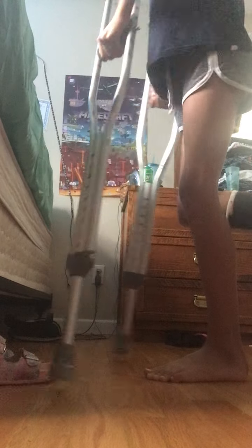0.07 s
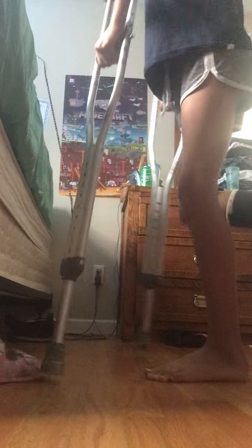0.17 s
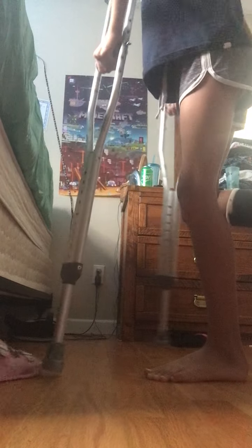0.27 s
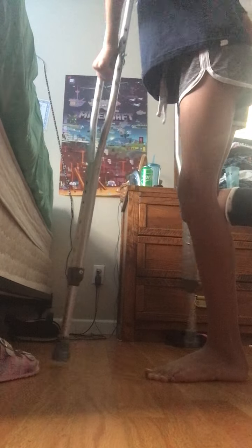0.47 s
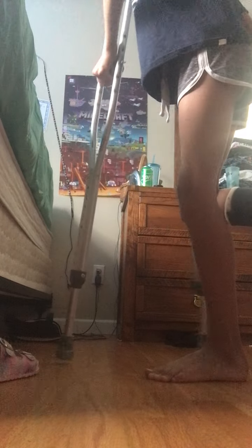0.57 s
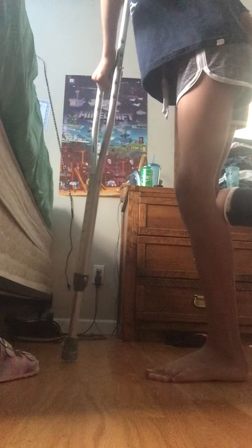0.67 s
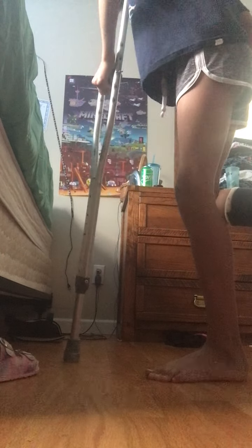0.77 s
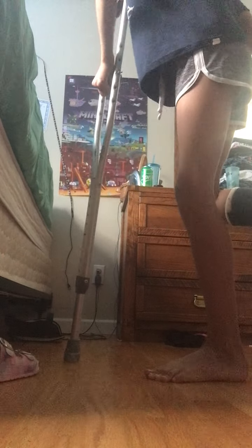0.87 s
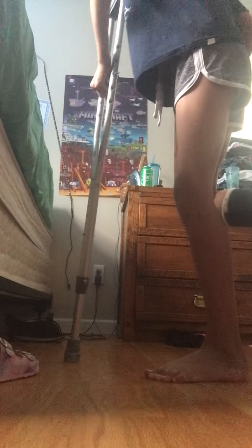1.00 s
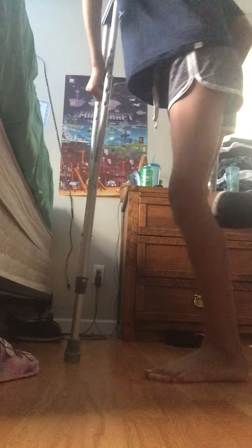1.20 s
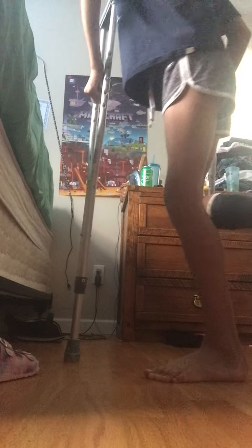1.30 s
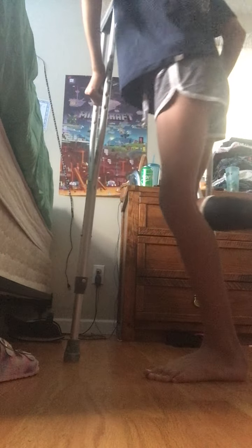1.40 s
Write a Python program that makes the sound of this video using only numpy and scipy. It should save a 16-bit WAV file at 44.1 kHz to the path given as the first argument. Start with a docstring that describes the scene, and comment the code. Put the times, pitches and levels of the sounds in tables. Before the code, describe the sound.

Metal crutches are planted on a wooden floor in a quiet bedroom. One rubber tip thuds as its loose tubes clack, then the second lands more softly, followed by a faint settling tick and knock.

```python
"""Two aluminium crutches are planted on a wooden floor in a small, quiet bedroom.
First one rubber tip thuds on the boards, and its loose sliding tubes clack as they take weight.
About 0.6 s later the second crutch lands more softly, with its own thuds and clacks.
Last come a faint tick and a soft knock as the crutches settle.
All along, the room rings briefly after each hit, over a low hush."""
import sys
import numpy as np
from scipy import signal
from scipy.fft import rfft, irfft
from scipy.io import wavfile

SR = 44100
rng = np.random.default_rng(int(sys.argv[2]) if len(sys.argv) > 2 else 0)


def to_wav(sig):
    """Store sig (one row per channel, or 1-D mono) as 16-bit WAV at the path in sys.argv[1].

    Samples outside -1..1 are clipped; the rate is SR.
    """
    pcm = np.clip(np.atleast_2d(sig), -1, 1) * 32767
    pcm = np.round(pcm).astype(np.int16)
    wavfile.write(sys.argv[1], SR, pcm.T)  # frames by channels


N = 63945

# Each push of a rubber tip: start_s, level_db, pitch_hz, peak_s, overtone_db, boom_db
TIP_THUDS = [(0.2421, -20.5, 247.4, 0.0084, -32, -40), (.260, -23, 195.4, 0.008, -24, -41.5),
             (.297, -31, 283, 0.0075, -25, -38), (.313, -27, 165.2, 0.014, -21.5, -32),
             (.357, -32, 160.4, 0.008, -36, -31), (.372, -35, 158, 0.011, -23, -36),
             (.415, -54, 177.6, 0.011, -18, -30), (0.485, -49.5, 161.2, 0.0096, -31, -34),
             (0.514, -57, 164.2, 0.016, -28, -41), (0.868, -41, 129.7, 0.013, -20.5, -32),
             (.894, -40, 129, 0.0068, -19, -18), (0.927, -42.5, 183, 0.0059, -13.5, -35),
             (0.935, -36, 138, .013, -18.5, -18), (.963, -46, 194, 0.0074, -26, -10),
             (0.978, -52, 129, 0.0105, -17, -12), (1.167, -55.5, 165.5, 0.0055, -3.5, -30),
             (1.174, -53, 159.8, 0.0093, -8, -28), (1.204, -57.5, 141, 0.0091, -3.5, -33)]
def thud(level_db, pitch_hz, peak_s, overtone_db, boom_db):
    """A rubber tip presses the floor: a low note swells and dies, and the whole floor booms faintly."""
    overtone_ratio = 2.195  # the boards' next way of bending
    boom_hz, boom_fade_s = 72, 0.24  # every fade_s is the time to fall by 60 dB
    t = np.arange(SR // 2) / SR
    note = np.sin(2 * np.pi * pitch_hz * t)
    overtone = amp(overtone_db) * np.sin(2 * np.pi * overtone_ratio * pitch_hz * t)
    boom_rise = 1 - np.exp(-(t / peak_s) ** 2)
    boom = amp(boom_db - 60 * t / boom_fade_s) * boom_rise * np.sin(2 * np.pi * boom_hz * t)
    return amp(level_db) * (swell(t / peak_s) * (note + overtone) + boom)


# The floorboards' own notes: pitch_hz, level_db, fade_s
BOARD_NOTES = [(120.3, -7.5, 0.45), (149.8, -13, 0.57), (190, 0, 0.27), (233, 3, 0.66)]
def floorboards(push):
    """The floorboards go on ringing after each push."""
    t = np.arange(SR // 2) / SR
    ringing = np.zeros(len(t))
    for pitch_hz, level_db, fade_s in BOARD_NOTES:
        scale = 2 * np.log(1000) / (fade_s * SR)  # stops longer notes from building up louder
        ringing += scale * amp(level_db - 60 * t / fade_s) * np.sin(2 * np.pi * pitch_hz * t)
    return push + amp(-8.5) * signal.fftconvolve(push, ringing)[:N]


# Where each clack's tone is turned up or down: frequency_hz
TONE_BANDS = [700, 2400, 3400, 4700, 7500]
# Each time the loose tubes knock together: start_s, level_db, chatter_s, room_db, one tone_db per band
TUBE_CLACKS = [(.2085, -70.5, 0.0029, 9, 3.5, 1, -3, -7, -11.5),
               (0.242, -48, 0.0083, -1.2, 3.5, 4, -1.5, -2.5, 2.5),
               (0.2555, -41, 0.0071, -1.3, -5, 1, 1, 2.5, -1),
               (.3230, -37.5, 0.0034, -2.9, -1, -2, 1, -2, 1),
               (.349, -61.5, 0.0039, -6.5, 17, 10, -6, 7, -12),
               (0.478, -68, 0.0032, -8.3, 8, 0, -10, 4, -3.5),
               (0.8621, -48, 0.0052, 0.098, -15, -1.5, -4.5, 2.5, -1),
               (.902, -61, 0.0052, -1.6, 2, 11.5, -2, -6, 0), (.9275, -52.5, 0.006, 4.1, -2, 3, 2.5, -1, 0),
               (.9335, -46, 0.0044, -0.62, -1.5, 3, -4, 2, -22),
               (.9592, -51.5, 0.0035, -0.41, -10, -4.5, 11, -5, 2),
               (.999, -62.5, 0.0023, 4.3, -10, -5, -7, -8, 5.5),
               (1.1115, -66, 0.0042, 1.6, -1.5, 0.5, -5.5, 3, 2),
               (1.1689, -63, 0.0052, -0.73, 2, 0, -9, -9, -17)]
def clack(level_db, chatter_s, room_db, *tone_db):
    """The tubes chatter together for a few milliseconds, ring faintly and set off the room."""
    rise_s = 0.00025
    t = np.arange(SR // 2) / SR
    rise = 1 - np.exp(-t / rise_s)
    contact = rise * np.exp(-(t / chatter_s) ** 4)
    chatter = contact * rng.choice([-1, 1], len(t))
    echo = amp(room_db + 2) * np.linalg.norm(contact) * room_echo()
    metal = metal_crack(chatter + echo) + amp(-27) * rise * tube_ring(t)
    return amp(level_db) * shape_tone(metal, list(zip(TONE_BANDS, tone_db)))


# The tone of metal hitting metal: frequency_hz, level_db
CRACK_TONE = [(120, -6.5), (330, 1.5), (460, 0.5), (640, 7), (1000, -7), (1350, -0.5), (1800, -7),
              (2350, 4), (2850, -4), (3300, 1), (3800, -11), (4550, -1.5), (5500, -5.5), (6800, -8.5),
              (7900, -19), (9000, -14), (10200, -29.5), (15000, -40)]
def metal_crack(burst):
    """Turns a burst of noise into a dry metal crack of about the same energy."""
    filter_gain = np.linalg.norm(shape_tone(signal.unit_impulse(len(burst)), CRACK_TONE))
    return shape_tone(burst, CRACK_TONE) / filter_gain


# The tubes' own notes: pitch_hz, level_db, fade_s
TUBE_NOTES = [(596, 4, 0.31), (1206, -0.5, .35), (2200, -19, 0.22), (2110, -2.5, 0.11), (2590, 2, 0.13),
              (2480, -1.5, 0.47), (2560, 12, .22), (3110, -2, 0.39), (4280, -4.5, 0.19), (4860, -16, 0.05),
              (4920, 5.5, 0.094)]
def tube_ring(t):
    """A struck tube rings with several pure notes, each fading at its own speed."""
    return sum(amp(level_db - 60 * t / fade_s) * np.sin(2 * np.pi * (pitch_hz * t + rng.random()))
               for pitch_hz, level_db, fade_s in TUBE_NOTES)


# Each square hit on a tube wall: start_s, level_db, pitch_hz, peak_s
TUBE_CLINKS = [(0.255, -38, 4250, 0.0019), (0.3238, -42, 4670, 0.0011), (0.445, -63, 2790, 0.0026),
               (0.4662, -63, 2550, 0.0016), (.8635, -50.5, 6900, 0.0017), (.9115, -51, 2300, 0.0019),
               (.928, -46, 4470, 0.0023), (.9328, -41.5, 2427, 0.0023), (.999, -53, 2494, 0.0029),
               (1.168, -56, 2390, 0.0024)]
def clink(level_db, pitch_hz, peak_s):
    """A tube wall gives one high note that dies almost at once, and the room echoes it."""
    t = np.arange(SR // 2) / SR
    note = amp(level_db) * swell(t / peak_s) * np.sin(2 * np.pi * pitch_hz * t)
    return note + amp(-7) * signal.fftconvolve(note, room_echo())[:len(t)]


# How long the bedroom rings, from bass to treble: frequency_hz, fade_s
ROOM_FADES = [(120, 0.22), (250, 0.28), (600, 0.29), (1400, 0.26), (2700, 0.23), (5000, 0.2), (9000, 0.17)]
def room_echo():
    """Many reflections blur into one tail that builds quickly and dies soonest in the treble."""
    build_s, fade_bend = 0.0013, 1.216  # a bend above 1 holds the tail, then drops it faster
    count = SR // 2
    hz, t, noise = signal.stft(rng.standard_normal(count), SR, nperseg=256)
    fall_db = -60 * (t / read_curve(ROOM_FADES, hz)[:, None]) ** fade_bend
    tail = signal.istft(noise * amp(fall_db), SR, nperseg=256)[1][:count]
    tail *= 1 - np.exp(-np.arange(count) / SR / build_s)
    return tail / np.linalg.norm(tail)


# The tone of the quiet room: frequency_hz, relative_level_db
HUSH_TONE = [(25, -42), (48, -29), (68, -14.5), (98, -27), (125, -5.5), (170, -1.5), (245, -0.5),
             (310, -10.5), (380, -10), (480, -18.5), (620, -17), (950, -24), (1280, -16), (1700, -22),
             (2500, -23), (5000, -27), (10000, -33.5), (15500, -37)]
def hush():
    """A steady low room rumble with a thin hiss."""
    gains = amp(read_curve(HUSH_TONE, np.fft.rfftfreq(N, 1 / SR)))
    noise = irfft(rfft(rng.standard_normal(N)) * gains, N)
    return amp(-68.5) * noise / np.sqrt(np.mean(noise ** 2))


def amp(db):
    """Turns decibels into a number to multiply by."""
    return 10 ** (np.asarray(db) / 20)


def swell(progress):
    """Rises smoothly to 1 when progress is 1, then dies away."""
    return (progress * np.exp(1 - progress)) ** 3


def read_curve(points, hz):
    """Reads between a table's rows, giving each octave about the same width."""
    row_hz, values = np.transpose(points)
    return np.interp(np.log(hz + 1), np.log(row_hz + 1), values)


def shape_tone(sound, points, size=4096):
    """Turns frequencies up or down along a curve of frequency_hz, level_db points."""
    hz = abs(np.fft.fftfreq(size, 1 / SR))
    log_gain = np.log(amp(read_curve(points, hz)))
    response = np.exp(np.conj(signal.hilbert(log_gain)))  # nothing rings before the hit
    taps = np.fft.ifft(response).real
    return signal.fftconvolve(sound, taps[:size // 2])[:len(sound)]


def add(mix, start_s, sound):
    """Mixes a sound in at its start time."""
    part = mix[max(round(start_s * SR), 0):][:len(sound)]
    part += sound[:len(part)]


def scene():
    """Thuds, clacks and clinks over the hush; the small microphone loses their deepest bass."""
    wall_delay_s, low_cut_hz = 0.02069, 55
    push = np.zeros(N)
    for start_s, *row in TIP_THUDS:
        add(push, start_s, thud(*row))
    wood = floorboards(push)
    mix = wood + amp(-9.5) * signal.fftconvolve(wood, room_echo())[:N]
    add(mix, wall_delay_s, amp(-15.5) * push)  # the nearest wall throws the thuds back
    for start_s, *row in TUBE_CLACKS:
        add(mix, start_s, clack(*row))
    for start_s, *row in TUBE_CLINKS:
        add(mix, start_s, clink(*row))
    bass_cut = signal.butter(4, low_cut_hz, "high", fs=SR, output="sos")
    return (signal.sosfilt(bass_cut, mix) + hush())[None]


def record(dry):
    """Takes away the very highest treble."""
    high_cut_hz = 15750
    treble_cut = signal.firwin(511, high_cut_hz, window=("kaiser", 9), fs=SR)
    return signal.oaconvolve(dry, treble_cut[None], "same")


dry = scene()
out = record(dry)
to_wav(out)
```